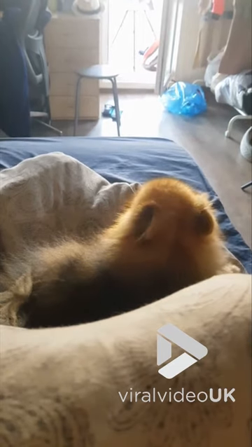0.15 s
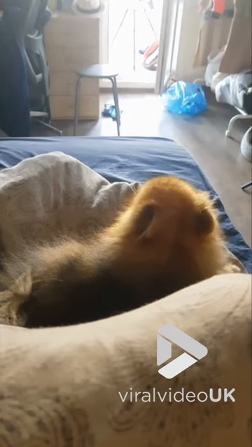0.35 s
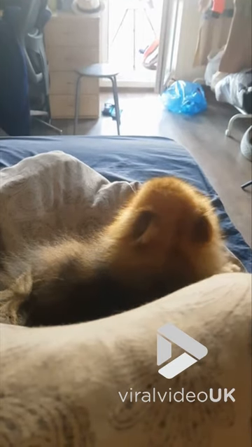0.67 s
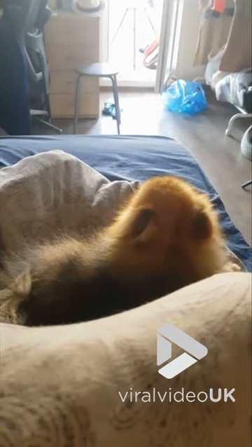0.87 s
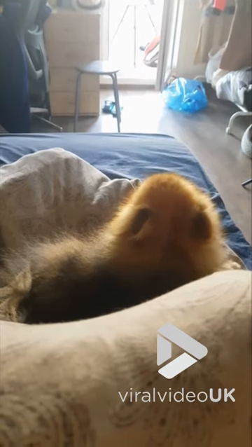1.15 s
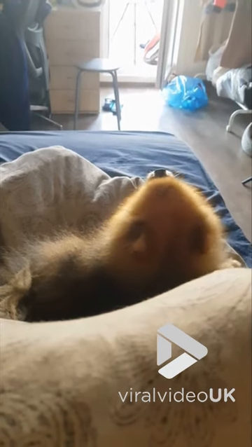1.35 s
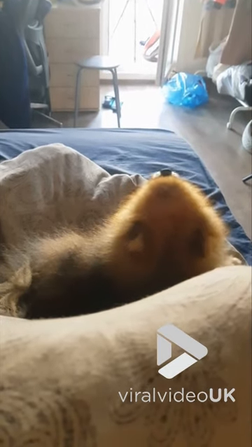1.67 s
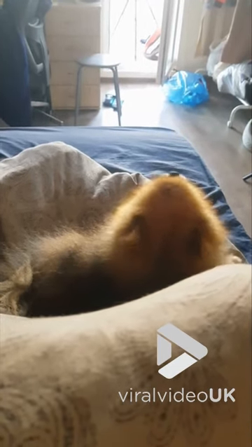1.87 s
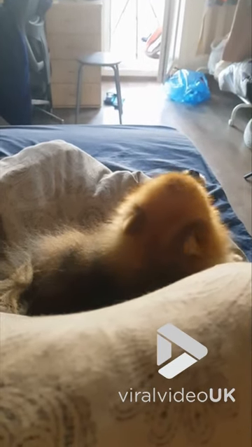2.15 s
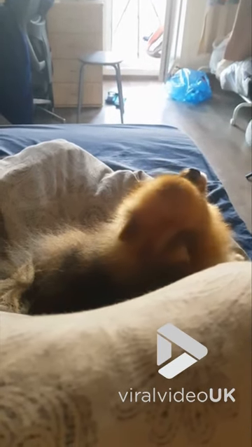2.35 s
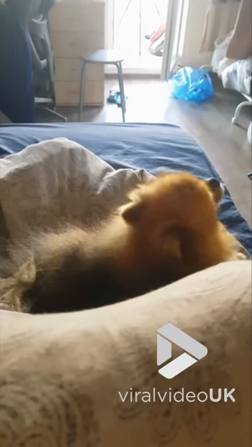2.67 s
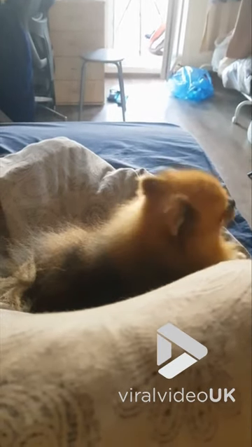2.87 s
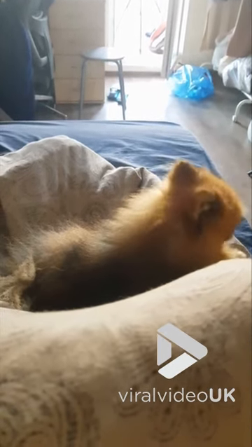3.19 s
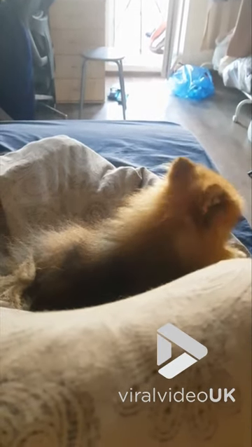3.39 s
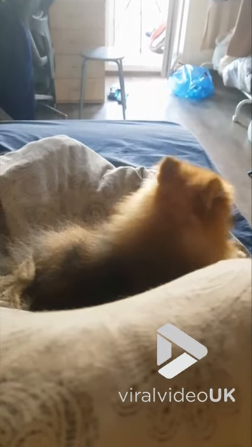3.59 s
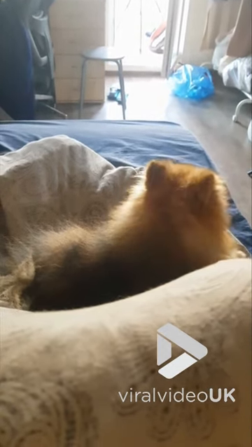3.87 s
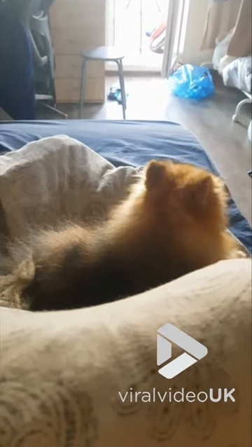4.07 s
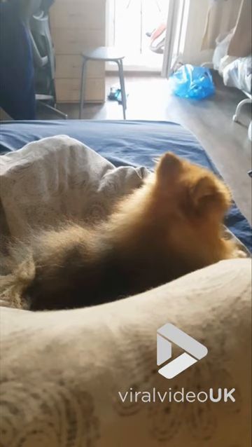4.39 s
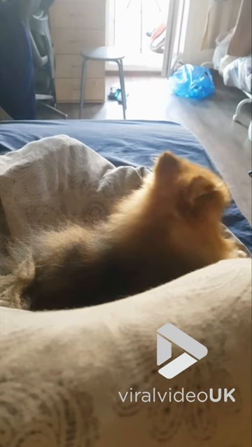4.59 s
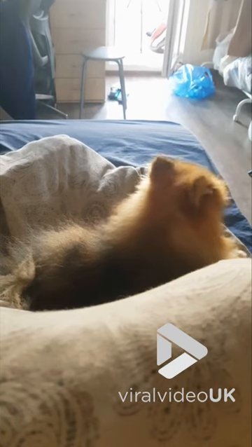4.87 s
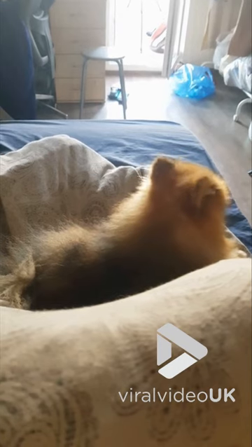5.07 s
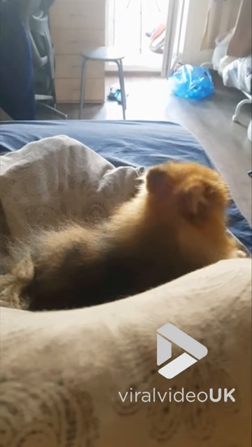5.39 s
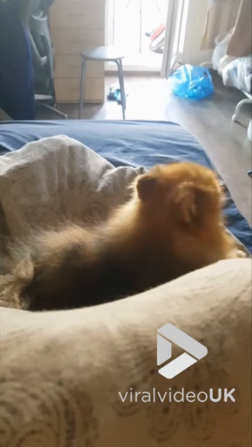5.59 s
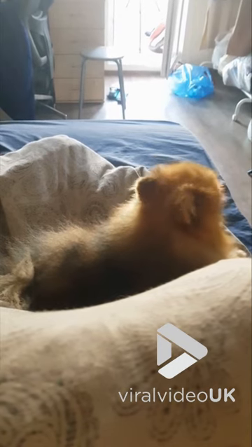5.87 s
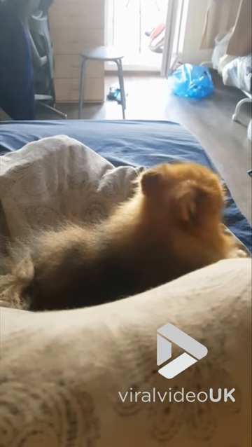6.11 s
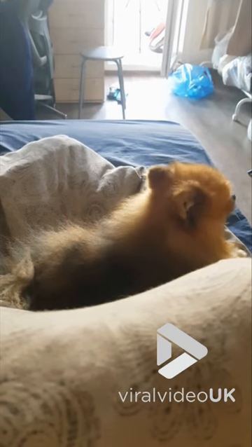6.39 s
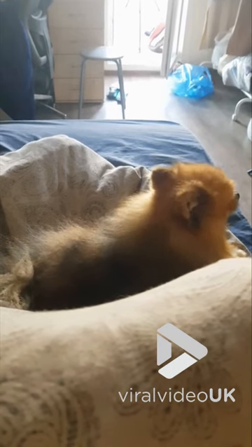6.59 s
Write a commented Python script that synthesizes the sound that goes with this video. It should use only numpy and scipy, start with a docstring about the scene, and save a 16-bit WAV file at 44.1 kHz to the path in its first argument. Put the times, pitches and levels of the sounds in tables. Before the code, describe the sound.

A small dog gives quick high yelps, two low wavering moans, then whimpering wails and more yelps in a quiet room.

```python
"""A small dog cries for attention: quick high yelps, two low wavering moans, then drawn-out whimpering
wails and a few more yelps. Its vocal folds make a near-pure head voice for the cries and a chest voice
for the moans, coloured by throat and mouth. The voice turns hoarse when pushed and cracks down an octave
as some cries run out. The dog is on a sofa, facing away from the microphone, in a quiet living room
that rings briefly over a faint rumble and hiss."""
import sys
import numpy as np
from scipy import signal
from scipy.fft import rfft, irfft, next_fast_len
from scipy.io import wavfile
from scipy.ndimage import uniform_filter1d, map_coordinates

SR = 44100
rng = np.random.default_rng(int(sys.argv[2]) if len(sys.argv) > 2 else 0)


def wav_out(sig):
    """Save sig, one row per channel (or a flat mono array), as 16-bit PCM at SR to the path in sys.argv[1]."""
    wavfile.write(sys.argv[1], SR, np.round(np.clip(np.atleast_2d(sig).T, -1, 1) * 32767).astype(np.int16))


N = 297218

# Quick yelps. Each row: start and length in seconds; base pitch, pitch fall and lift at the push in Hz;
# moment of the push 0-1; fundamental, octave and shrill overtone levels in dB; hoarseness 0-1; lower and
# upper mouth resonance in Hz; upper resonance level, thin ring level and left-over-right pan in dB.
YELPS = [(0.047,0.056,806.4,13.5,-1.5,0.62,-26.5,-42,-47,0.1,2970,4800,5,-32,-3.5),
         (0.276,0.056,889,35.5,6.5,0.5,-27,-37,-52,0.31,2435,4500,8,-9.5,-2.5),
         (0.5,0.15,926.7,285.5,60,0.43,-27,-35,-50,0.27,2460,3650,9,-8,-1),
         (0.789,0.07,880,18,22.5,0.43,-28.5,-25,-38,0.13,2374,3920,10,0,-0.5),
         (0.98,0.077,783.5,86,13,0.8,-27.5,-38.5,-57.5,0.13,2900,4500,-25,-23,-3),
         (1.196,0.088,768,9,111.5,0.54,-22.5,-29.5,-50,0.4,2680,3450,-2.5,-9.5,-2.5),
         (1.426,0.072,761.3,81.5,76,0.56,-24.5,-36.5,-55,0.1,2640,4100,0,-5,1),
         (1.65,0.053,753.5,63,-1,1,-28,-41.5,-59.5,0.13,2770,4500,-29,-10,-1),
         (2.212,0.088,678,24.5,111,0.39,-23,-32,-44.5,0.54,2340,3100,-26,-9,-0.5),
         (2.483,0.1,704.2,29,46.5,0.27,-26,-39,-42,0.9,2353,3820,1.5,-23,-2),
         (5.764,0.021,901,36.5,17,0.91,-47,-63.5,-60,0.08,2498,3900,-10.5,-25,0.5),
         (6.505,0.043,805.8,0,3,0.64,-38.5,-24.5,-34.5,0.42,2700,4000,-6,-24,-1.5),
         (6.686,0.046,842.7,69,1,0.8,-34,-30.5,-40,0.08,2400,3200,-17,-34,0.5)]
# One curve per wail. Each row: time in seconds, pitch in Hz, then fundamental, octave and shrill
# overtone levels in dB.
WAILS = [
    [(1.863,805,-39.5,-60,-88.5), (1.886,698,-29,-44,-70.5), (1.924,658.5,-32.5,-42.5,-65.5),
     (1.99,653.3,-37.5,-66,-56.5), (2.026,602,-35,-53,-61.5), (2.065,587,-39,-52,-79)],
    [(4.685,987,-57.5,-87,-96), (4.705,924,-48,-64.5,-86), (4.757,852,-46,-51,-78),
     (4.787,791,-42,-49,-74.5), (4.869,785.7,-43,-50.5,-78.5), (4.9,870,-53.5,-70,-77)],
    [(5.144,940,-45,-49.5,-65), (5.164,937.6,-35.5,-34,-48), (5.192,1089,-32,-32,-47),
     (5.224,1042,-29.5,-33.5,-45), (5.254,888,-38,-48.5,-64), (5.298,797.4,-29.5,-47.5,-72.5),
     (5.42,798.4,-37,-43.5,-64), (5.458,719.7,-31.5,-37.5,-66), (5.505,700.6,-39,-55.5,-68)],
    [(6.068,827,-45.5,-74.5,-90), (6.098,816,-38.5,-44.5,-82), (6.124,837.4,-51.5,-52,-89),
     (6.185,798,-38.5,-46,-83), (6.23,758.5,-36,-47,-51.5), (6.292,742.5,-37.5,-34.5,-39),
     (6.34,731,-39,-51,-51.5)],
]
# The vowel of each wail. Each row: lower and upper mouth resonance in Hz, then upper resonance level,
# thin ring level, left-over-right pan and nasal hiss in dB.
WAIL_MOUTHS = [(2800, 3000, 4, -26, 1.5, -26), (2580, 6300, 12, -7, 0, 0.5),
               (2100, 3470, -11.5, -19, -1, -16.5), (2030, 4500, -7.5, -36, -3, -32.5)]
# One curve per moan. Each row: time in seconds, pitch in Hz, throat level in dB, mouth level in dB.
MOANS = [
    [(2.736, 449, -51.5, -68), (2.766, 395, -36, -55.5), (2.812, 399, -37, -61.5),
     (2.862, 308.5, -44.5, -52.5), (2.904, 301, -41.5, -58), (2.964, 363.9, -46, -55),
     (2.998, 364, -43, -55), (3.062, 311.4, -46, -52), (3.172, 318.6, -52.5, -59), (3.232, 226.8, -44, -51),
     (3.33, 212.6, -48.5, -62.5), (3.356, 235.5, -45, -60), (3.452, 199.4, -51, -63),
     (3.52, 165.4, -56, -67.5)],
    [(3.828, 438, -54.5, -79), (3.848, 354.7, -51.5, -75), (4.002, 333.8, -50.5, -66),
     (4.08, 439, -57, -82), (4.16, 383, -50.5, -68), (4.23, 444, -51.5, -70), (4.254, 493, -53.5, -69),
     (4.272, 664, -47.5, -63), (4.31, 666, -51.5, -62)],
]
# How far the fundamental stands out as the muzzle closes. One value per moan, in dB.
MUZZLE_DB = [-3.1, 9.3]
# Hoarse patches in wails and moans. Each row: middle and half length in seconds, added roughness 0-1.
HOARSE_PATCHES = [(3.24, 0.072, 0.12), (3.48, 0.088, 0.23), (4.79, 0.063, 0.13), (5.2, 0.06, 0.5),
                  (5.47, 0.02, 0.03), (6.31, 0.027, 0.31)]
# Cracks to the octave below. Each row: middle and half length in seconds, gain of half-pitch partials.
OCTAVE_CRACKS = [(1.062, 0.0028, 0.071), (2.052, 0.0042, 0.3), (2.31, 0.0043, 0.3), (2.573, 0.0092, 0.3)]

# EQ curves of the voice. Each row: frequency in Hz, relative level in dB.
CRY_MOUTH_EQ = [(1800, 17.5), (2900, 4), (4400, 0.5), (5600, 4), (6300, -7.5), (7000, -23), (9000, -10),
                (12000, -29)]  # overtones and breath of yelps and wails
NOSTRIL_EQ = [(4500, -10), (5600, -1.5), (6300, -4), (7400, -7), (8300, -17.5), (9100, -4.5), (11000, -12)]  # hiss through the nose
MOAN_THROAT_EQ = [(180, -1), (240, 3), (330, 3.5), (400, -4.5), (460, 1.5), (540, 2.5), (620, 2.5),
                  (700, 7.5), (800, 2), (950, 3), (1100, -2.5)]  # low body
MOAN_MOUTH_EQ = [(1000, 3), (1200, 17), (1450, 13), (1620, 9), (1800, -9), (2100, -17), (2600, -36),
                 (4000, -66)]  # midrange overtones
MOAN_EDGE_EQ = [(2000, 7), (2450, 3), (2900, -10.5), (3700, -29), (4600, -6.5), (5500, -12), (8000, -25.5)]  # raspy top
# The room's ring. Each row: frequency in Hz, time to fall 60 dB in seconds.
ROOM_DECAY = [(200, 0.36), (700, 0.37), (1600, .4), (3000, 0.33), (6000, 0.49), (12000, 0.031)]
# Room rumble and microphone hiss. Each row: frequency in Hz, relative level in dB.
RUMBLE_EQ = [(12, -22), (20, -6.5), (70, -7), (238, -27), (275, -30), (388, -26.5), (484, -26), (1200, -26),
             (1490, -34), (2010, -24.5), (2440, -38), (7000, -45.5), (9100, -75.5), (15400, -120)]
HISS_EQ = [(7000, -24), (8400, -21.5), (8900, -11), (9800, -7), (10400, 0.5), (13000, -1), (15500, 1.5)]


def cries():
    """Yelps and wails in head voice: a near-pure tone that grows overtones as the mouth opens."""
    clear_rough, clear_air = 0.14, 0.029  # roughness and breathiness of the unstrained voice
    out = np.zeros((2, N))
    air, nose = breath(CRY_MOUTH_EQ), breath(NOSTRIL_EQ)
    for i, gate, pitch, (base_db, octave_db, shrill_db), hoarse, mouth in [*yelps(), *wails()]:
        *shape, pan_db, hiss_db = mouth
        phase, size = folds(pitch, clear_rough + hoarse, waver=.004, jitter=.05, shimmer=.3, grit=.02)
        # when the voice cracks, every second cycle differs
        sub_octave = bumps(OCTAVE_CRACKS, i / SR) * (np.sin(phase / 2) + .5 * np.sin(3 * phase / 2))
        fundamental = amp(base_db) * (np.sin(phase) + sub_octave)
        tone = np.sqrt(2) * (fundamental + amp(octave_db) * np.sin(2 * phase))
        overtones = partials(phase, pitch, range(3, 15),
                             lambda hz: vowel(hz, *shape) * eq(CRY_MOUTH_EQ, hz))
        # air escapes in one puff per cycle, coloured by the same vowel
        puffs = air[i] * (1 + np.cos(phase))
        colour = vowel(np.fft.rfftfreq(len(i), 1 / SR), *shape)
        puffs = unit(irfft(rfft(puffs) * colour, len(i)))
        # the hoarser the voice, the more its overtones dissolve into a shriek of air
        airy = np.clip(clear_air + 0.76 * hoarse, 0, .95)
        shrill = np.sqrt(1 - airy ** 2) * overtones + airy * puffs + amp(hiss_db) * nose[i]
        pan = amp([[pan_db / 2], [-pan_db / 2]])
        out[:, i] += gate * size * (tone + amp(shrill_db) * shrill) * pan
    return out


def yelps():
    """Each yelp catches, swells and fades as its pitch sags; one push brightens it, and it ends hoarse."""
    crest, swell_db_per_s = 0.45, 105  # swell peak (share of the length); longer yelps have softer ends
    catch_hz, catch_s, catch_rough = 45.4, 0.0054, 0.4  # the folds catch above the note and drop onto it
    lips_db, lips_s = 6.5, 0.014  # shut lips dull the attack
    linger, nasal_db = 0.45, -39  # share of the fade the overtones follow; hiss under the shrill layer
    for start, length, note_hz, fall_hz, lift_hz, moment, *timbre in YELPS:
        base_db, octave_db, shrill_db, hoarse, *mouth = timbre
        i, gate = call_gate(start, start + length, attack=.008, release=.018)
        t = np.clip(i / SR - start, 0, length)
        progress = t / length
        catch = np.exp(-t / catch_s)
        push = bell(progress, moment, half=.28)
        pitch = note_hz + catch_hz * catch - fall_hz * progress + lift_hz * push
        swell_db = -swell_db_per_s * length * (2 * (progress - crest)) ** 2
        # the overtones rise with the tone, but the mouth stays open while it fades
        opening_db = np.where(progress < crest, 1, linger) * swell_db - lips_db * np.exp(-t / lips_s)
        levels = (base_db + swell_db,
                  octave_db + opening_db - 5.5 * (1 - push),
                  shrill_db + opening_db - 7 * (1 - push))
        rough = hoarse * bell(progress, middle=0.93, half=0.41) + catch_rough * catch
        yield i, gate, pitch, levels, rough, (*mouth, nasal_db)


def wails():
    """Long whimpers that slide down in pitch, hoarse where they are pushed."""
    for rows, mouth in zip(WAILS, WAIL_MOUTHS):
        i, gate, (pitch, *levels) = call_curves(rows, attack=.008, release=0.018)
        yield i, gate, pitch, levels, bumps(HOARSE_PATCHES, i / SR), mouth


def moans():
    """Chest voice through a nearly closed mouth: harmonics swell as they cross the throat's resonances."""
    out, air = np.zeros(N), breath(MOAN_EDGE_EQ)
    lows = lambda hz: 1 / (1 + (hz / 1100) ** 16)  # crossover from throat to mouth
    for rows, muzzle_db in zip(MOANS, MUZZLE_DB):
        i, gate, (pitch, throat_db, mouth_db) = call_curves(rows, attack=0.0077, release=0.032)
        rough = 0.27 + bumps(HOARSE_PATCHES, i / SR)
        phase, size = folds(pitch, rough, waver=0.0077, jitter=0.078, shimmer=0.19, grit=0.11)
        throat_gain = lambda hz: eq(MOAN_THROAT_EQ, hz) * amp(muzzle_db * (hz < 2 * pitch)) * lows(hz)
        throat = partials(phase, pitch, range(1, 8), throat_gain)
        mouth = partials(phase, pitch, range(2, 14), lambda hz: eq(MOAN_MOUTH_EQ, hz) * (1 - lows(hz)))
        # a raspy edge of buzz and air gains 16 dB on the mouth for each octave the pitch sinks
        buzz = partials(phase, pitch, range(6, 26), lambda hz: eq(MOAN_EDGE_EQ, hz))
        edge = buzz + air[i] * (1 + np.cos(phase))
        edge_db = mouth_db - 23.5 + 16 * np.log2(244 / pitch)
        out[i] += gate * size * (amp(throat_db) * throat + amp(mouth_db) * mouth + amp(edge_db) * edge)
    return out


def folds(pitch, rough, waver, jitter, shimmer, grit):
    """Phase and size of the vocal folds' swing: no two cycles match, and roughness adds flutter."""
    n = len(pitch)
    rate = pitch * (1 + waver * wobble(n, 70) + jitter * rough * wobble(n, 330))
    size = 1 + shimmer * rough * wobble(n, 260) + grit * wobble(n, 1100)
    return 2 * np.pi * np.cumsum(rate) / SR, size


def partials(phase, pitch, harmonics, tract):
    """Harmonics of the folds, weighted by the vocal tract's gain, at a steady rms of 1."""
    orders = np.array(harmonics)[:, None]
    gain = tract(orders * pitch)
    return np.sqrt(2) * (gain * np.sin(orders * phase)).sum(0) / np.sqrt((gain ** 2).sum(0) + 1e-12)


def vowel(hz, lower_hz, upper_hz, upper_db, ring_db):
    """The mouth's gain: two resonances and a thin ring near 6 kHz."""
    peak = lambda centre, width: 1 / (1 + ((hz - centre) / width) ** 2)
    return peak(lower_hz, 360) + amp(upper_db) * peak(upper_hz, 410) + amp(ring_db) * peak(5780, 400)


def breath(curve):
    """Turbulent air at rms 1, shaped by an EQ curve with a low cut at its first point."""
    low_cut_hz = curve[0][0]
    colour = lambda hz: eq(curve, hz) / (1 + (low_cut_hz / (hz + 1)) ** 8)
    return unit(filtered(rng.standard_normal(N), colour))


def call_curves(rows, attack, release):
    """Sample indices, gate and curves of a long call, rounded by the muscles' inertia."""
    times, *columns = np.transpose(rows)
    i, gate = call_gate(times[0], times[-1], attack, release)
    return i, gate, [uniform_filter1d(np.interp(i / SR, times, c), size=300) for c in columns]


def call_gate(start, end, attack, release):
    """Sample indices of one call and its soft on-off gate; times in seconds."""
    edges = [start - attack / 2, start + attack / 2, end, end + release]
    i = np.arange(max(0, int(edges[0] * SR)), min(N, int(edges[-1] * SR)))
    return i, np.sin(np.pi / 2 * np.interp(i / SR, edges, [0, 1, 1, 0])) ** 2


def bell(x, middle, half):
    """A bell-shaped swell of height 1."""
    return np.exp(-((x - middle) / half) ** 2)


def bumps(rows, t):
    """A swell for each (middle, half length, height) row."""
    return sum(height * bell(t, middle, half) for middle, half, height in rows)


def wobble(n, rate):
    """Smooth random modulation, n samples long, with rate points a second."""
    return map_coordinates(rng.standard_normal(int(n * rate / SR) + 4), [np.arange(n) * rate / SR])


def amp(db):
    """Decibels to gain."""
    return 10 ** (np.asarray(db) / 20)


def unit(x):
    """Scale to rms 1."""
    return x / np.sqrt(np.mean(x ** 2) + 1e-20)


def along(points, hz):
    """(Hz, value) points read on a log axis."""
    freqs, values = np.transpose(points)
    return np.interp(np.log(hz + 1), np.log(freqs + 1), values)


def eq(curve, hz):
    """Gain of a (Hz, dB) curve."""
    return amp(along(curve, hz))


def filtered(x, response):
    """x through a filter given as gain against frequency."""
    size = next_fast_len(N + SR // 2)
    return irfft(rfft(x, size) * response(np.fft.rfftfreq(size, 1 / SR)), size)[..., :N]


def room(x, wet_db, bright_db, early_db):
    """Near walls and a diffuse tail; the dog faces away, so its treble comes mostly by reflection."""
    hz, t, noise = signal.stft(rng.standard_normal((2, SR // 2)), SR, nperseg=256)
    decay = amp(-60 * t / along(ROOM_DECAY, hz)[:, None])
    near_walls = 1 + amp(early_db) * np.exp(-t / 0.016)
    mid, side = signal.istft(noise * decay * near_walls, SR, nperseg=256)[1]
    tail = np.pad([mid + side, mid - side], ((0, 0), (int(.004 * SR), 0)))  # 4 ms pre-delay
    wet = signal.fftconvolve(x, tail / np.linalg.norm(tail[0]), axes=1)[:, :N]
    return amp(wet_db) * filtered(wet, lambda hz: eq([(800, 0.017), (2500, bright_db)], hz))


def noise_bed(curve, db):
    """Steady noise with a narrow stereo image."""
    mid, side = filtered(rng.standard_normal((2, N)), lambda hz: eq(curve, hz))
    return amp(db) * unit(np.array([mid + .28 * side, mid - .28 * side]))


def scene():
    """The dog slightly to the right, its room, a low rumble and microphone hiss."""
    dog = cries() + moans() * amp([[-.8], [.8]])
    direct = filtered(dog, lambda hz: eq([(900, -0.01), (2500, -6)], hz))  # duller from behind
    reverb = room(dog, wet_db=-5.0, bright_db=2.5, early_db=3.5)
    rumble = noise_bed(RUMBLE_EQ, db=-68.5) * amp([[-3], [1.8]])
    hiss = noise_bed(HISS_EQ, db=-71.5)
    return direct + reverb + rumble + hiss


def record(dry):
    """The phone's band limit: a brick-wall high cut at 15550 Hz."""
    return filtered(dry, lambda hz: hz < 15550)


dry = scene()
out = record(dry)
wav_out(out)
```